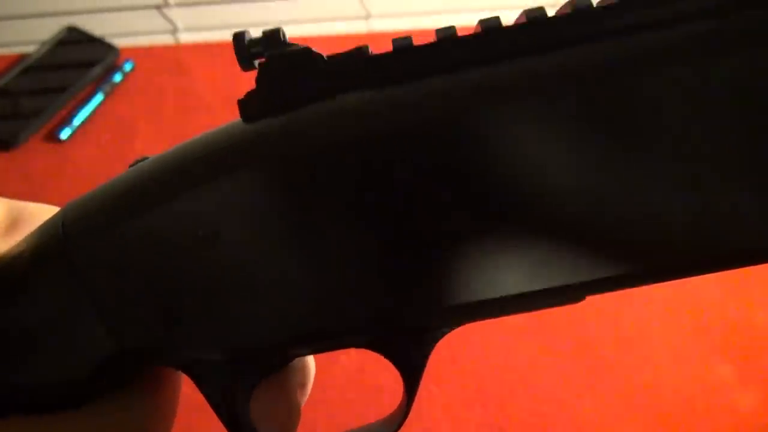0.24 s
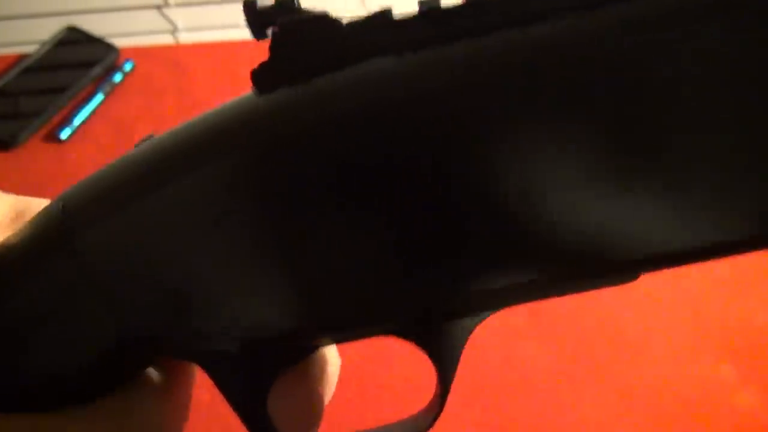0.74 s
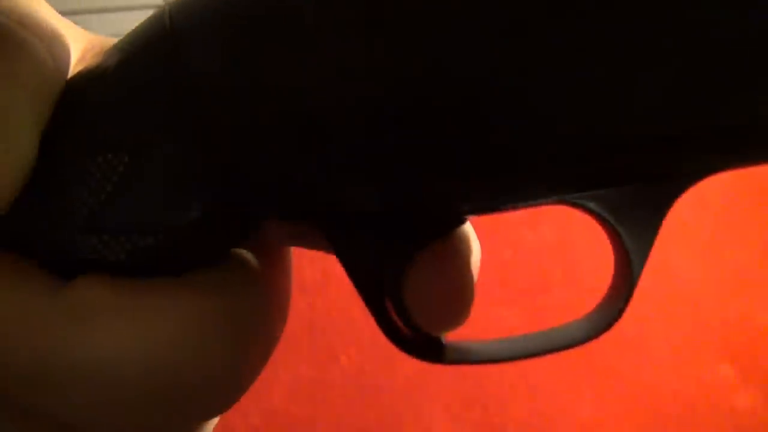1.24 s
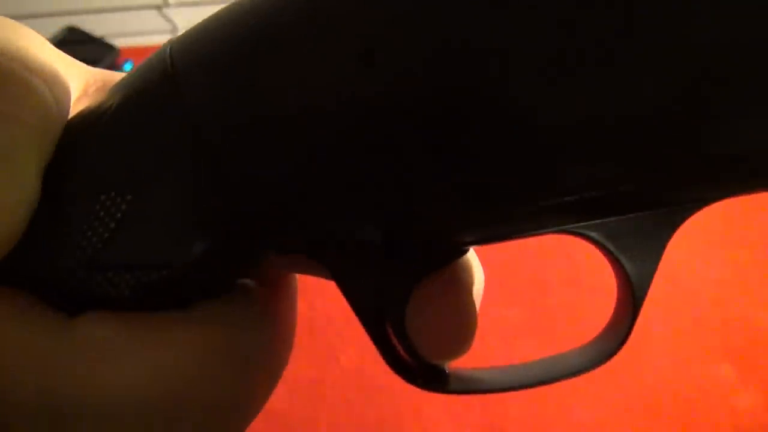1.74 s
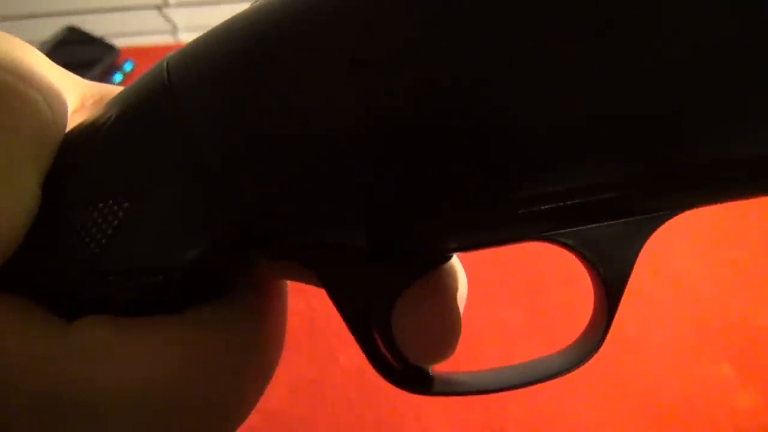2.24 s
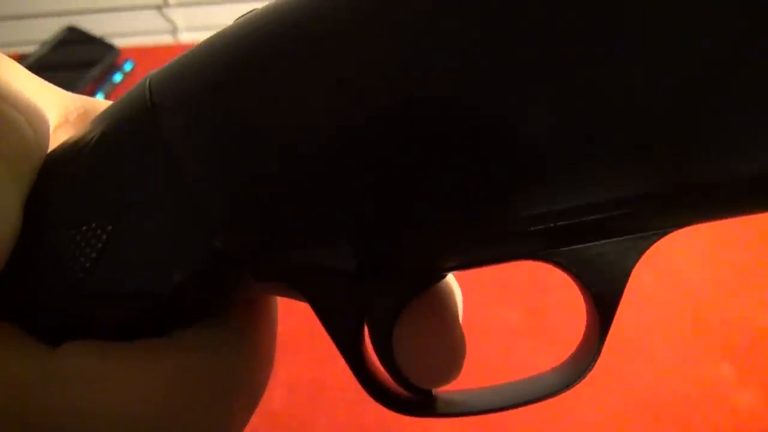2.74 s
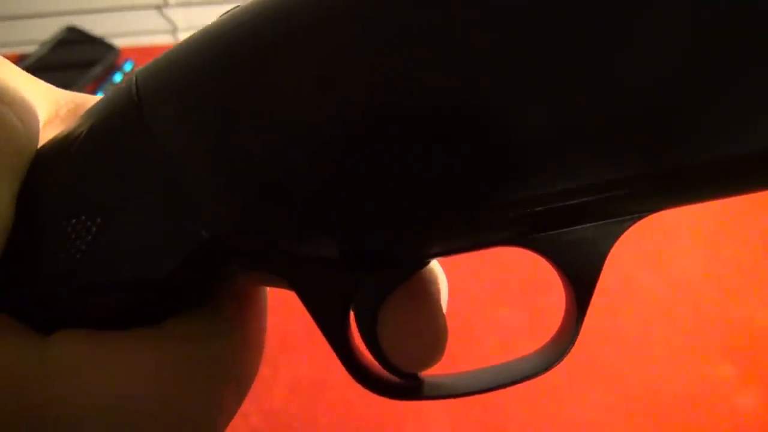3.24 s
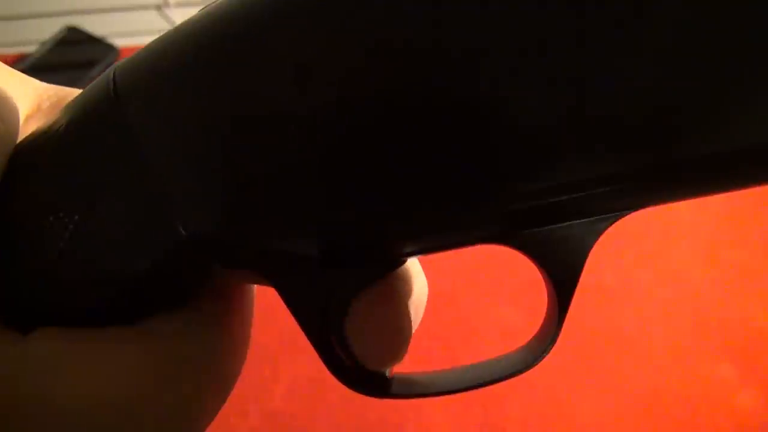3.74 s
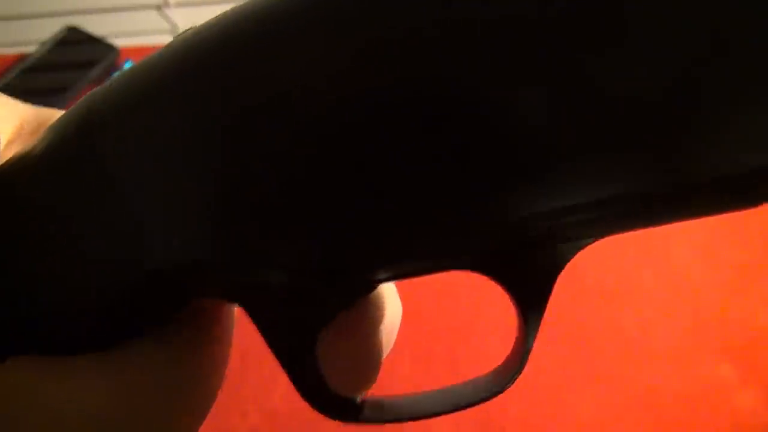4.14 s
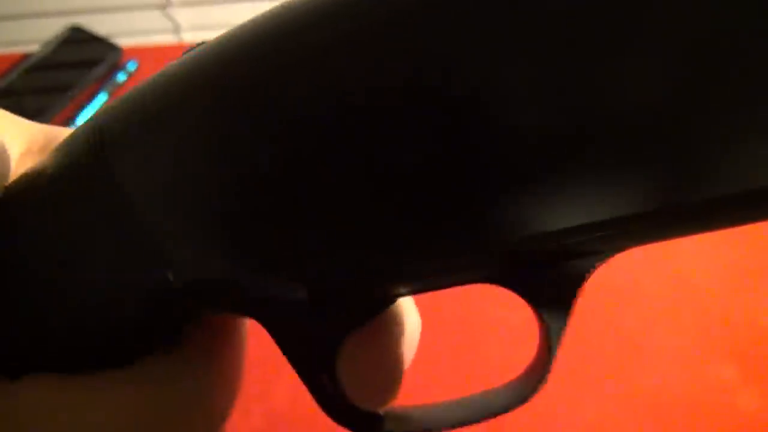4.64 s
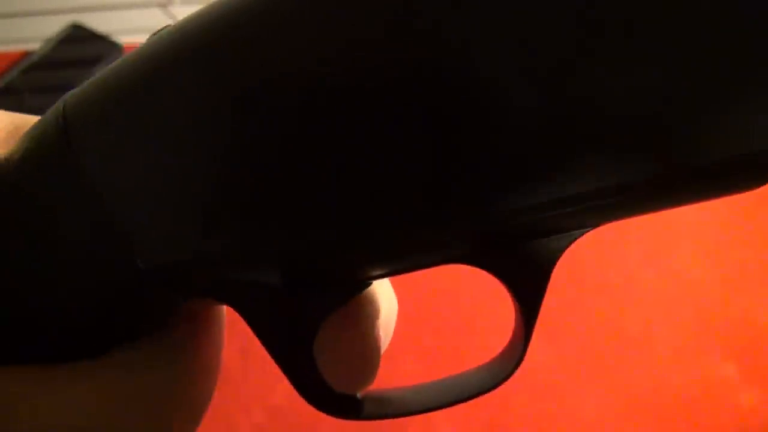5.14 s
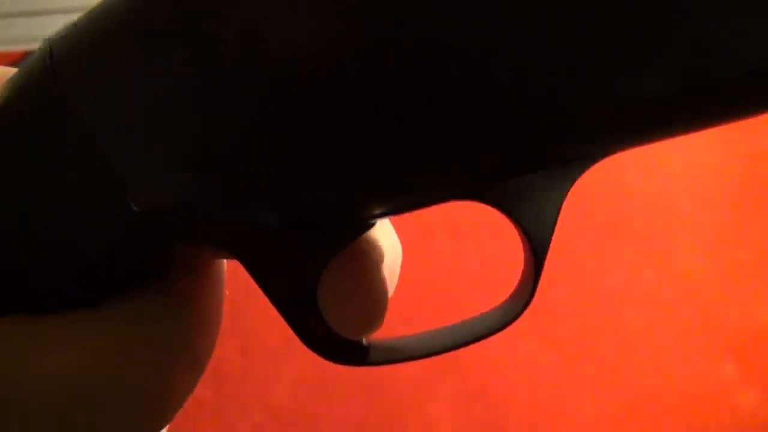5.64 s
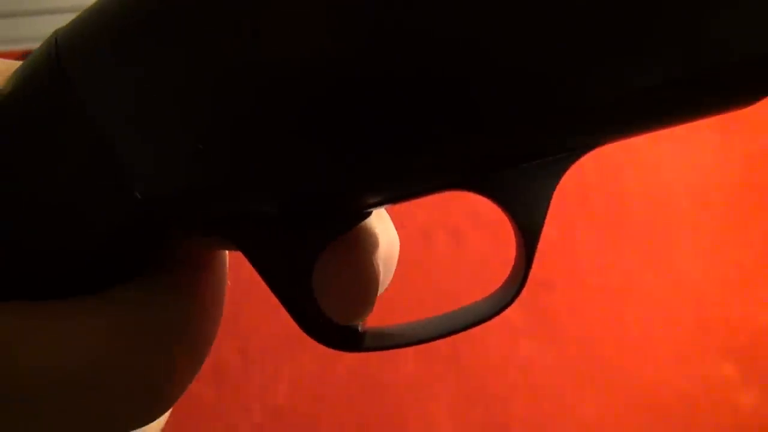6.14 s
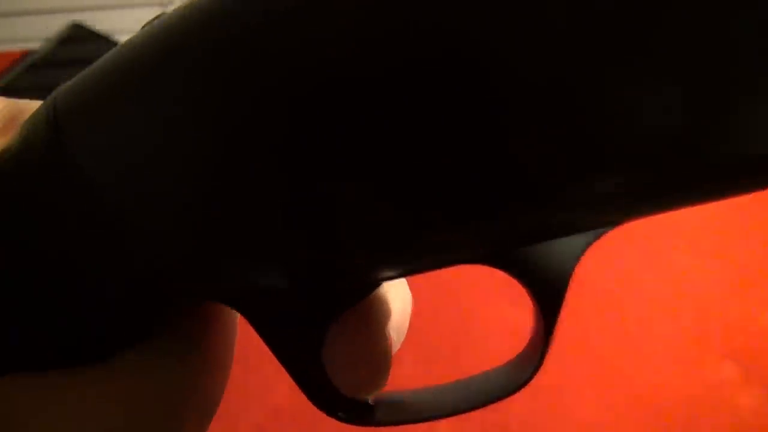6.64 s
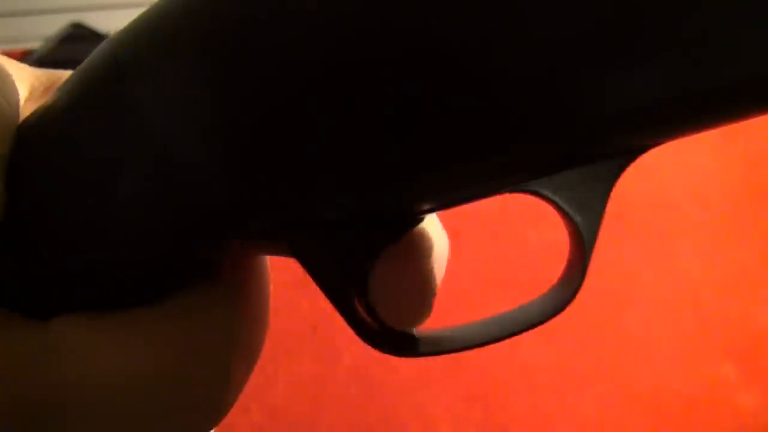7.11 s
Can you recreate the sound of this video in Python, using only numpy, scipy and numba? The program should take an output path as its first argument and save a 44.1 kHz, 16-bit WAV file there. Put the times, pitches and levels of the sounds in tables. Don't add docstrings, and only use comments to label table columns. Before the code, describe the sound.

Steel shotgun action worked near a phone microphone: unlatching clatter, gritty slide scrape, heavy rear stop, rising squeal and closing slam. Near silence and a small metallic snap come before a sharp dry-fire clack. The rack, pause and dry-fire repeat, then a final slower rack ends abruptly. The sound is bright, dry and slightly squashed, with short hard room reflections.

```python
import sys
import numpy as np
from scipy import signal
from scipy.fft import rfft, irfft, next_fast_len
from scipy.io import wavfile
from scipy.ndimage import uniform_filter1d
from numba import njit

SR = 44100
rng = np.random.default_rng(int(sys.argv[2]) if len(sys.argv) > 2 else 0)


def invert_db(level):
    return 10 ** (np.asarray(level, dtype=float) / 20)


def dump_mix(stems):
    frames = np.atleast_2d(stems).T
    limited = np.clip(frames, -1, 1)
    pcm = np.round(limited * 32767).astype(np.int16)
    wavfile.write(sys.argv[1], SR, pcm)


N = 325235


def colour(x, table):
    hz, db = np.transpose(table)
    size = next_fast_len(len(x))
    bins = np.log(np.arange(size // 2 + 1) * SR / size + 1)
    gain = invert_db(np.interp(bins, np.log(hz), db))
    return irfft(rfft(x, size) * gain, size)[:len(x)]


def level(x, db):
    return x * invert_db(db) / np.sqrt(np.mean(x ** 2))


def mode(x, hz, t60):
    pole = np.exp(2j * np.pi * hz / SR - np.log(1000) / (t60 * SR))
    return signal.lfilter([1], [1, -pole], x).imag


def add(track, s, sound):
    start = int(s * SR)
    track[start:start + len(sound)] += sound[:N - start]


# frequency in Hz, density in dB per Hz.
HUSH_MID = [(12, -38), (20, -15), (114, -0.5), (147, -5), (194, -1.5), (304, -7.5), (392, -4), (490, -13.5),
            (597, -16.5), (1550, -12.5), (1690, -19), (2430, -18.5), (3120, -23.5), (3400, -22.5),
            (16400, -26)]
# frequency in Hz, density in dB per Hz.
HUSH_SIDE = [(12, -38), (20, -3.5), (96, -3), (747, -15.5), (1550, -20), (1690, -20), (4020, -30),
             (9600, -23.5), (16400, -50)]


def hush(table, db):
    steps = np.repeat(rng.standard_normal(N // 4096 + 1), 4096)[:N]
    waver_db = uniform_filter1d(steps, 4096)
    return level(colour(rng.standard_normal(N), table) * invert_db(waver_db), db)


# frequency in Hz, time to fade by 60 dB in seconds.
ROOM_T60 = [(100, 0.99), (260, 0.55), (700, 0.35), (1840, 0.39), (4850, 0.39), (12800, 0.23)]
# frequency in Hz, level in dB.
ROOM_COLOUR = [(100, -10.5), (300, 12.5), (1000, 6), (3000, 0.5), (6000, -0.5), (10000, -4), (16000, -4.5)]


def room(x):
    room_db, rise_s = -14, 0.0048
    swell_db, swell_s = -1, 0.012
    late_db, late_stretch = -21.5, 1.88
    t, tail = np.arange(SR) / SR, 0
    hz, t60 = np.transpose(ROOM_T60)
    for centre in 88 * 2. ** np.arange(0, 7.6, .5):
        edges = [centre / 2 ** .25, centre * 2 ** .25]
        band_filter = signal.butter(2, edges, "band", fs=SR, output="sos")
        band = signal.sosfilt(band_filter, rng.standard_normal(SR))
        fade_db = -60 * t / np.interp(np.log(centre), np.log(hz), t60)
        tail = tail + band * (invert_db(fade_db) + invert_db(late_db + fade_db / late_stretch))
    build_up = 1 - np.exp(-(t / rise_s) ** 2)
    swell = invert_db(swell_db * np.exp(-(t / swell_s) ** 2))
    tail = colour(tail * build_up * swell, ROOM_COLOUR)
    return signal.fftconvolve(x, tail / np.sqrt(np.sum(tail ** 2)))[:N] * invert_db(room_db)


# moment in seconds, peak in dB, fade in dB per second.
SHIFTS = [(0, -57, 60.5), (.2, -50.5, 199), (.95, -59, 60.5), (1.336, -73, 101), (3.0, -74, 39.5),
          (3.506, -65.5, 168.5), (3.67, -76, 204.5), (4.95, -56, 40.5), (5.396, -67, 67),
          (5.699, -78, 104.5), (5.87, -59.5, 61), (6.021, -60, 194.5)]


def shifts():
    t, rise_db_s = np.arange(N) / SR, 221.5
    loudness = np.zeros(N)
    for s, db, fade_db_s in SHIFTS:
        drop_db = np.where(t < s, rise_db_s * (s - t), fade_db_s * (t - s))
        loudness += invert_db(db - drop_db)
    return loudness


# start in seconds, end in seconds, final level in dB, rise in dB.
STROKES = [(0, 0.204, -56, -1.5), (0.29, 0.424, -17.5, 45), (0.504, 0.658, -23, 12.5),
           (3.094, 3.668, -63.5, 0.5), (4.089, 4.15, -45.5, -4), (4.21, 4.417, -29, 5),
           (4.505, 4.68, -27, 4.5), (5.862, 6.015, -64.5, -5), (6.438, 6.47, -44, 17),
           (6.635, 6.823, -32.5, 2), (7.035, 7.255, -24, 46)]


def strokes():
    out = np.zeros(N)
    for start, end, db, rise_db in STROKES:
        to_go = np.linspace(1, 0, int((end - start) * SR))
        add(out, start, invert_db(db - rise_db * to_go ** 2))
    return out


# frequency in Hz, density in dB per Hz.
RUB_COLOUR = [(59, -47.5), (100, -9), (1130, -4.5), (1650, -3.5), (1800, -2), (8460, -11.5), (12700, -21),
              (16000, -45)]


def rub():
    grain_db = 3 * np.minimum(rng.exponential(size=N), 4)
    grit = rng.standard_normal(N) * invert_db(grain_db)
    cloth_filter = signal.butter(2, [200, 750], "band", fs=SR, output="sos")
    cloth = signal.sosfilt(cloth_filter, rng.standard_normal(N))
    return level(colour(grit, RUB_COLOUR), -4.5) * strokes() + level(cloth, 0) * shifts()


# start in seconds, peak in dB, pitch in Hz.
JOLTS = [(0.208, -44, 153), (0.298, -45.5, 148), (0.409, -26.5, 94), (0.667, -31, 117.2),
         (3.682, -17, 44.7), (4.169, -30.5, 159), (4.389, -24, 81.4), (4.468, -36.5, 70.0),
         (4.548, -39, 154.6), (4.701, -43.5, 64.5), (6.04, -24, 104.5), (6.479, -56, 48.4),
         (6.768, -44.5, 26.9), (6.829, -29.5, 29.6), (7.104, -39.5, 121), (7.268, -33, 40.5)]


def jolts():
    out, t = np.zeros(N), np.arange(SR // 4) / SR
    for s, db, hz in JOLTS:
        add(out, s, 2 * invert_db(db) * np.sin(2 * np.pi * hz * t) * np.exp(-2.2 * hz * t))
    return signal.sosfilt(signal.butter(1, 30, "high", fs=SR, output="sos"), out)


# start in seconds, end in seconds, level in dB.
DRAGS = [
    (3.672, 3.684, -30.5),
    (6.0195, 6.031, -38),
    (2.927, 2.935, -47.5),
    (5.70, 5.712, -43),
]
# frequency in Hz, density in dB per Hz.
DRAG_COLOUR = [(400, -33), (900, -0.5), (2800, -7), (5500, -13), (7000, -44.5)]


def drags():
    out = np.zeros(N)
    for start, end, db in DRAGS:
        swell = np.linspace(.4, 1, int((end - start) * SR))
        scrape = colour(rng.standard_normal(4096), DRAG_COLOUR)[:len(swell)]
        add(out, start, level(scrape * swell, db))
    return out


# start in seconds, end in seconds, level in dB.
SQUEALS = [
    (0.554, 0.672, -32),
    (4.586, 4.705, -34.5),
    (7.156, 7.26, -33),
]


def squeals():
    from_hz, to_hz, width_hz = 1800, 2917, 200
    out = np.zeros(N)
    for start, end, db in SQUEALS:
        way = np.linspace(0, 1, int((end - start) * SR))
        rough = uniform_filter1d(rng.standard_normal(len(way)), int(SR / width_hz / 2))
        phase = 2 * np.pi * np.cumsum(from_hz + (to_hz - from_hz) * way) / SR
        swell = np.sqrt(np.sin(np.pi * way) ** 2 + way / 2)
        add(out, start, level(rough * np.sin(phase) * swell, db))
    return out


# moment in seconds, strength in dB.
UNLATCH_BLOWS = [
    (.225, -1),
    (4.176, -6.5),
    (6.487, -11.5),
]
BACK_BLOWS = [
    (.41, 0.29),
    (4.39, 0.88),
    (6.825, 0.64),
]
HOME_BLOWS = [
    (.672, 0.0042),
    (4.705, 0.0084),
    (7.265, 0),
]
HAMMER_BLOWS = [
    (3.695, 6.9),
    (6.04, 3.5),
]
RESET_BLOWS = [
    (2.936, -5),
    (5.711, 5),
]
# pitch in Hz, phase memory in seconds, time to fade by 60 dB in seconds, level in dB.
UNLATCH_RING = [(550, .01, .4, -36), (315, .2, .4, -28)]
BACK_RING = [(340, 0.067, 0.91, -32.5), (250, .04, 0.54, -37.5), (624, 0.0061, 0.35, -35),
             (1480, 0.0061, 0.16, -23.5), (1950, 0.003, .35, -24)]
HOME_RING = [(347, .15, .5, -26), (210, .04, .4, -37), (430, .04, .33, -38), (650, .01, .45, -38),
             (1590, .012, .62, -36), (2700, .005, .4, -30)]
HAMMER_RING = [(840, .025, .33, -31), (2900, .002, .42, -29), (1070, .02, .56, -26), (260, .02, .15, -30),
               (400, .02, .4, -41), (1500, .005, .62, -33), (3470, .006, .42, -34), (9700, .003, .25, -30)]
RESET_RING = [(900, .01, .12, -48)]
# start in seconds, pitch in Hz, phase memory in seconds, time to fade by 60 dB in seconds.
STRAY_RINGS = [(0, 3600, 1, .5), (.672, 10960, .02, .22), (3.7, 10960, .1, .1), (7.277, 10960, .05, .3),
               (.672, 930, 8, 2.2), (3.692, 930, 8, 1.5), (4.7, 930, 8, 1.9), (5.73, 1060, .5, .6),
               (5.85, 200, .1, .2), (3.505, 600, .003, .05), (7.11, 600, .01, .4),
               (2.937, 5000, .0015, .35)]
STRAY_DB = [-62.5, -21, -26, -23, -48, -43, -52, -52, -50, -51, -36.5, -55]


def rings():
    kinds = [(UNLATCH_BLOWS, UNLATCH_RING), (BACK_BLOWS, BACK_RING), (HOME_BLOWS, HOME_RING),
             (HAMMER_BLOWS, HAMMER_RING), (RESET_BLOWS, RESET_RING)]
    struck = []
    for blows, ring in kinds:
        for s, hard_db in blows:
            struck += [(s, hz, memory_s, t60, db + hard_db) for hz, memory_s, t60, db in ring]
    struck += [(*ring, db) for ring, db in zip(STRAY_RINGS, STRAY_DB)]
    out, t = np.zeros(N), np.arange(SR) / SR
    onset = 1 - np.exp(-t / 0.0013)
    for s, hz, memory_s, t60, db in struck:
        tone = level(mode(rng.standard_normal(2 * SR), hz, memory_s)[SR:], 0)
        tone = mode(tone, hz, min(memory_s, .03))
        add(out, s, tone / tone[:SR // 8].std() * invert_db(db - 60 * t / t60) * onset)
    return out


def blur(blow):
    power = uniform_filter1d(np.abs(rfft(blow)) ** 2, size=28)
    return np.roll(irfft(np.sqrt(power + 1e-18)), 128)


# start in seconds, peak in dB, level thrown into the room in dB.
SEAR_SNAPS = [
    (2.9354, -1.5, -3),
    (5.7132, -3.5, 0),
]
# pitch in Hz, level in dB, time to fade by 60 dB in seconds.
SEAR_MODES = [(1010, -19.5, .008), (2200, -14, 0.0058), (2900, -17.5, 0.0071), (3500, -12.5, 0.011),
              (4370, -12.5, 0.0092), (4600, -10, 0.0067), (5420, -12, .007), (6200, -9.5, 0.011),
              (7250, -5, .005), (8550, -8, 0.0074), (10050, -2.5, .003), (11420, -1, 0.006),
              (12600, -9.5, 0.0033), (13900, -10.5, .004)]


def sear():
    double_s, double_db = .0004, -6
    rattle_db, rattle_s = -31, .005
    out = np.zeros((2, N))
    for s, db, throw_db in SEAR_SNAPS:
        push = invert_db(rattle_db) * rng.standard_normal(2048) * np.exp(-np.arange(2048) / SR / rattle_s)
        push[[0, int(double_s * SR)]] = 1, invert_db(double_db)
        ring = 0
        for k, (hz, mode_db, t60) in enumerate(SEAR_MODES):
            ring = ring + (-1) ** k * invert_db(mode_db) * mode(push, hz, t60)
        peak = np.abs(ring).max()
        add(out[0], s, ring / peak * invert_db(db))
        add(out[1], s, blur(blur(ring)) / peak * invert_db(db + throw_db))
    return out


def strike(push, family, centre_hz, t60, spread):
    focus_width, scatter_db, detune = .8, 2.5, .05
    ring = 0
    for k, (hz, db) in enumerate(family):
        focus = np.exp(-(np.log(hz / centre_hz) / focus_width) ** 2)
        gain = (-1) ** k * focus * invert_db(db + scatter_db * spread[k])
        ring = ring + gain * mode(push, hz * (1 + detune * spread[-k - 1]), t60)
    return ring


# pitch in Hz, level in dB.
BODY = [(830, -3), (1070, 4.5), (1390, 3.5), (1600, 3), (1900, 6.5), (2250, 4.5), (2800, 2.5)]
PARTS = [(3550, -7), (4400, -3.5), (5200, 0.8), (6000, 4.66), (6700, 4.44), (7500, 0.7)]
EDGES = [(8700, -3), (9600, 5.5), (10800, 5.5), (11900, -3), (13200, -9), (14800, -13.5)]
MODE_T60_S = (.006, .004, .0014)


def contacts(table, chatter_s, loose_db=0):
    creep_db, creep_s = -17, 0.0018
    rattle_db, rattle_s = -7.5, 0.0042
    steel_low_hz = 665.7
    near, far = np.zeros(N), np.zeros(N)
    t = np.arange(2048) / SR - .01
    after = np.maximum(t, 0)
    snap = np.sqrt(after / chatter_s) * np.exp(-after / chatter_s)
    creep = invert_db(creep_db) * np.exp(t / creep_s)
    rattle = invert_db(rattle_db) * np.exp(-t / rattle_s)
    shape = snap + invert_db(loose_db) * np.where(t < 0, creep, rattle)
    impulse = 1. * (t == t[0])
    for s, body_db, parts_db, edges_db, throw_db, centre_hz in table:
        push = rng.standard_normal(len(t)) * shape
        spreads = rng.standard_normal((3, 16))
        centres, levels = (centre_hz, 5500, 11000), (body_db, parts_db, edges_db)
        layers = zip((BODY, PARTS, EDGES), centres, MODE_T60_S, levels, spreads)
        for family, hz, t60, db, spread in layers:
            ring = strike(push, family, hz, t60, spread)
            ring = ring / np.abs(ring).max() * invert_db(min(db, 0))
            blow = blur(strike(impulse, family, hz, t60 / 3, spread / 3))
            same_energy = np.sqrt(np.sum(ring ** 2) / np.sum(blow ** 2))
            add(near, s + t[0], ring)
            add(far, s, blow * same_energy * invert_db(throw_db))
    return signal.sosfilt(signal.butter(3, steel_low_hz, "high", fs=SR, output="sos"), [near, far])


def layered(table, throw_db, centre_hz):
    s, db, bright = np.transpose(table)[:3]
    parts_db = db + 0.47 * bright + 0.5
    return np.transpose(np.broadcast_arrays(s, db, parts_db, db + bright, throw_db, centre_hz))


# start in seconds, body peak in dB, brightness in dB, body centre in Hz.
TRIGGER = [(.0546, -37.5, -13.5, 2320), (.1479, -40, -26, 1530), (.2042, -11, -2.5, 1840),
           (1.337, -50, -19, 1217), (3.5073, -45.5, -18, 1060), (3.6835, -9.5, -31, 990),
           (3.6867, -14, 11, 1494), (4.0938, -25, -28, 1640), (4.1289, -40.5, -29.5, 1950),
           (5.8933, -32, -17, 1150), (5.9128, -33.5, -9, 2000), (6.0308, -13.5, -27, 1390),
           (6.0349, -13.5, 7.5, 1586)]


def trigger():
    rows = layered(TRIGGER, -5, np.transpose(TRIGGER)[3])
    return contacts(rows, chatter_s=.00015, loose_db=-8)


# start in seconds, body peak in dB, small parts minus body in dB, edges minus body in dB.
UNLATCH = [(0.208, -13.5, 0, -9.5), (0.217, -2.5, -6.5, -12), (0.228, -10, 0, -7.5),
           (0.236, -12.5, -9, -10.5), (0.244, -13.5, -5, -3.5), (0.25, -13, -1, -8.5),
           (4.157, -7, -12.5, -14.5), (4.166, -10.5, -1, -3.5), (4.166, -7.5, -1.5, -8),
           (4.176, -10, -1.5, -6), (4.185, -15, -14.5, -9.5), (4.193, -12.5, -6, -6.5),
           (4.196, -18, -6.5, -8), (4.201, -13, -3, -16.5), (6.477, -6.5, -7.5, -13),
           (6.488, -11.5, -3, -8.5), (6.5, -13, 0.5, -9), (6.513, -15.5, -13.5, -18.5),
           (6.527, -24, 1, -7.5)]
PULL = [(0.288, -13, -0.5, -3), (0.313, -13.5, 3, -4), (0.33, -12.5, -10.5, -5), (0.35, -22.5, 2, 8),
        (0.363, -14.5, 0.5, -2), (0.386, -15.5, -7, -12), (0.391, -14.5, -6.5, -13), (0.397, -3, -9, -11.5),
        (4.276, -11.5, 0.5, -4), (4.305, -13, 0, 0.5), (4.336, -21, 0, 3.5), (4.347, -18, -1.5, 8),
        (4.368, -13.5, -6, -12), (4.374, -9, -5.5, -14.5), (4.38, -9, -5.5, -2), (6.632, -41, -10, 2.5),
        (6.675, -14, -4.5, 0.5), (6.7, -20, 6, 2.5), (6.72, -14.5, -14, -8), (6.745, -22, 3, 10),
        (6.766, -20.5, 0.5, 6.5), (6.782, -18, -9.5, -19.5), (6.786, -12.5, -3.5, -19),
        (6.794, -13.5, -8, -11.5), (6.802, -9.5, -8, -15), (6.81, -4.5, -9, -9)]
PUSH = [(0.508, -10.5, -9.5, -16.5), (0.558, -15, 1, -7), (0.582, -11.5, -5.5, -8.5),
        (0.598, -15.5, -6.5, -3.5), (0.619, -15, -7, -10.5), (0.629, -12.5, -9.5, -10),
        (0.654, -6.5, -7.5, -9.5), (0.715, -5, -12, -18), (4.432, -3, -13, -23), (4.453, -11, -11, -16.5),
        (4.499, -18.5, -9, -22), (4.529, -20, -0.5, -4.5), (4.553, -10.5, -3, -4.5),
        (4.567, -15.5, -3.5, -5), (4.582, -13.5, -9, -11), (4.601, -11, -6, -10), (4.629, -12.5, -1.5, -12),
        (4.648, -11, -7.5, -8), (4.677, -8.5, -13, -28), (4.684, -12.5, -2, -11), (4.721, -12, -8, -10.5),
        (7.068, -21.5, -23, -31), (7.076, -26, -11.5, -19), (7.106, -15.5, -1.5, -7),
        (7.111, -16, 1.5, -7.5), (7.116, -10, -9, -20), (7.124, -18.5, -12.5, -3), (7.141, -13, -9.5, -4),
        (7.161, -12, -5, -8.5), (7.194, -14, -4, -10.5), (7.208, -25, 2, 5), (7.211, -15, -4.5, -5),
        (7.247, -4, -11, -14.5)]
# extra level thrown into the room in dB, body centre in Hz.
UNLATCH_WAY = (4.2, 2200)
PULL_WAY = (.3, 2400)
PUSH_WAY = (.3, 1600)


def ticks():
    lag_s, body_trim_db, parts_trim_db = .0006, -0.37, 3.5
    edges_trim_db, edges_contrast = 6, 1.1
    rows = []
    for table, way in ((UNLATCH, UNLATCH_WAY), (PULL, PULL_WAY), (PUSH, PUSH_WAY)):
        for s, db, parts, edges in table:
            parts_db = db + parts + parts_trim_db
            edges_db = db + edges_contrast * edges + edges_trim_db
            rows.append((s + lag_s, db + body_trim_db, parts_db, edges_db, *way))
    return contacts(rows, chatter_s=.00028)


# start in seconds, body peak in dB, brightness in dB,
# extra level thrown into the room in dB, body centre in Hz.
SLAMS = [(0.4044, -7.5, 3, 3, 2000), (0.4102, -9.5, 3, 8, 1700), (.4163, -4, 0, 14.5, 1500),
         (0.663, -7.5, 2, 18, 2464), (.6722, -11, 8.5, 9.5, 2300), (3.6914, -6, 7, 13, 1159),
         (3.7, -16, 3.5, 14, 1294), (4.3872, -7.5, 1.5, 4, 2075), (4.3909, -3, 5, 13.5, 1897),
         (4.3997, -4, 0, 7.5, 1500), (4.6941, -20, -1.5, 6.5, 2580), (4.6976, -10, 0.5, 19, 2590),
         (4.706, -15.5, 1, 4, 2403), (4.7103, -11, 0.5, 11, 2310), (6.0387, -12, 6, 7, 1109),
         (6.0432, -10.5, 6, 16, 1190), (6.8178, -8.5, -2, 6.5, 2200), (6.8215, -2.5, -3, 15, 1987),
         (6.8325, -9.5, 1, 9, 1772), (7.2581, -14, -3.5, 12.5, 2310), (7.2632, -5.5, -7.5, 14, 2403),
         (7.271, -12.5, 1.5, 4, 2200), (7.2771, -11.5, 0.5, 15, 1915)]


def slams():
    rows = layered(SLAMS, *np.transpose(SLAMS)[3:])
    return invert_db(1.5) * contacts(rows, chatter_s=0.0017)


# frequency in Hz, side minus mid in dB.
SIDE_COLOUR = [(60, -10), (110, -5), (200, -12), (380, -17), (700, -19), (1290, -18), (2380, -17),
               (4400, -12), (8120, -3), (15000, -19)]


def scene():
    near, far = ticks() + trigger() + slams() + sear()
    slide, thumps, ringing = rub() + squeals() + drags(), jolts(), rings()
    mid = near + slide + room(far + slide) + ringing + thumps
    apart = 0.47 * np.roll(near + slide, 3) + room(far + slide) + .7 * np.roll(ringing, 9)
    side = colour(apart, SIDE_COLOUR) + invert_db(-5) * np.roll(thumps, 330)
    mid, side = mid + hush(HUSH_MID, -61), side + hush(HUSH_SIDE, -70)
    return np.array([mid + side, mid - side])


# moment in seconds, depth in dB.
DUCKS = [
    (.424, 3.5),
    (.678, 4),
    (3.699, 3),
    (4.405, 1.5),
    (4.714, 1.5),
    (6.047, 5.5),
    (6.845, 1.5),
    (7.281, 3),
]


def ducking():
    db, t = np.zeros(N), np.arange(SR // 4) / SR
    for s, depth_db in DUCKS:
        add(db, s, -depth_db * np.exp(-(t / .035) ** 2))
    return invert_db(uniform_filter1d(db, size=80))


@njit
def limiter(size, top, ratio, attack, release):
    gain, e = np.ones(len(size)), 0.
    for i in range(len(size)):
        e += (size[i] - e) * (attack if size[i] > e else release)
        if e > top:
            gain[i] = (top / e) ** (1 - 1 / ratio)
    return gain


def band_limit(x):
    return signal.sosfilt(signal.butter(12, 16510, fs=SR, output="sos"), x)


# frequency in Hz, level in dB.
MIC = [(20, -4.5), (11000, -2), (15000, 0.5), (16500, -20.5)]
# frequency in Hz, left minus right in dB.
LEAN = [(30, -6), (60, 0.6), (125, -1.5), (250, -1.5), (500, 1.5), (1000, -0.86), (2380, -1), (4400, -1),
        (8120, 0.1), (15000, 1)]


def record(dry):
    attack_s, release_s = .0006, 0.0073
    ports = []
    for port, sign in zip(dry, (1, -1)):
        half_lean = np.array(LEAN) * [1, sign / 2]
        ports.append(colour(colour(port, MIC), half_lean))
    dry = np.array(ports)
    peaks = np.abs(dry).max(axis=0)
    gain = limiter(peaks, invert_db(-11.5), 1.6, 1 / (attack_s * SR), 1 / (release_s * SR)) * ducking()
    mix = np.tanh(dry * gain * 1.466) / 0.99
    return band_limit(mix)


dry = scene()
out = record(dry)
dump_mix(out)
```